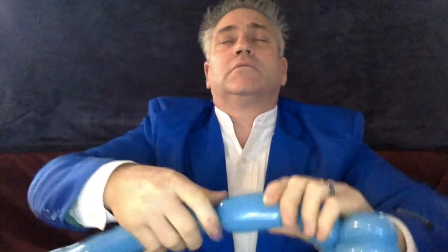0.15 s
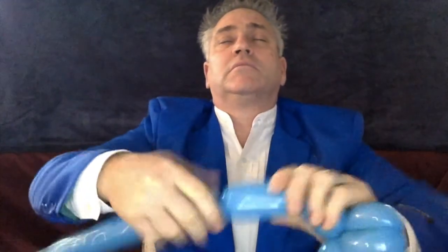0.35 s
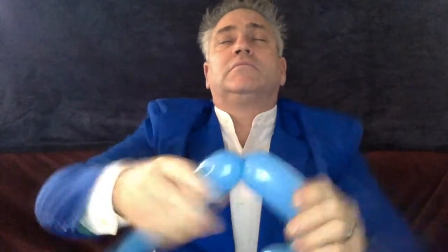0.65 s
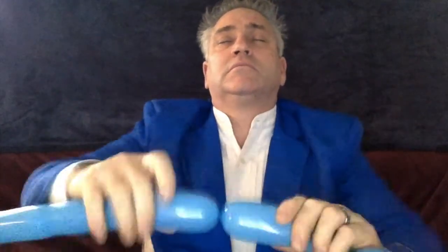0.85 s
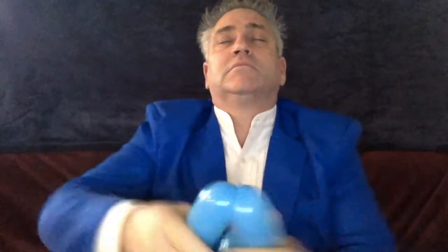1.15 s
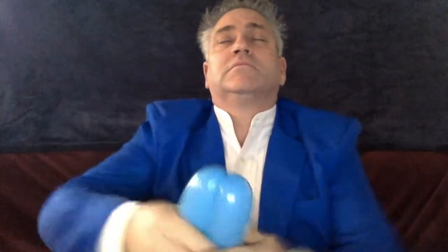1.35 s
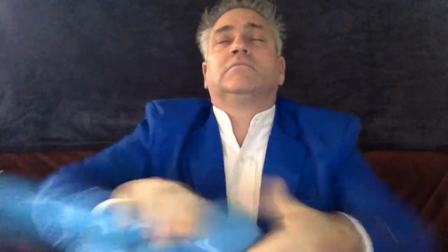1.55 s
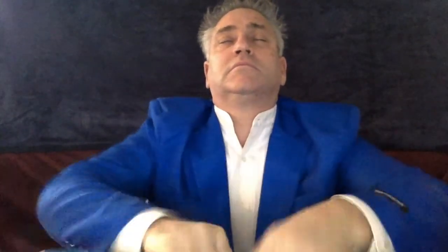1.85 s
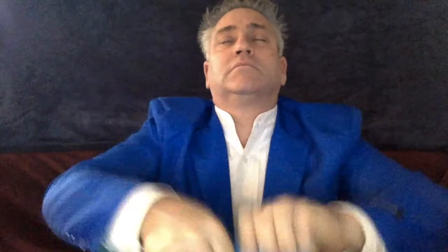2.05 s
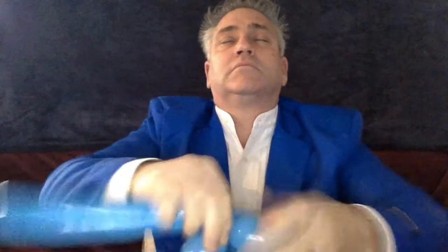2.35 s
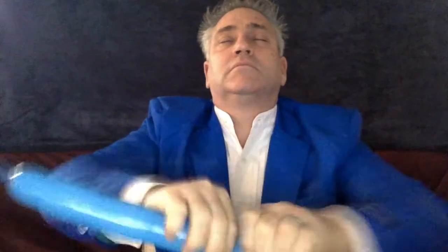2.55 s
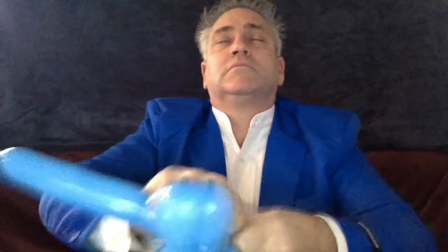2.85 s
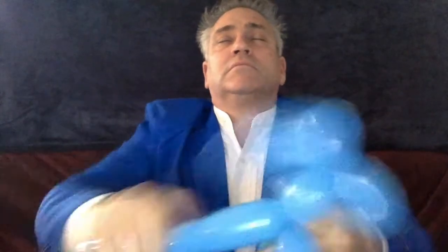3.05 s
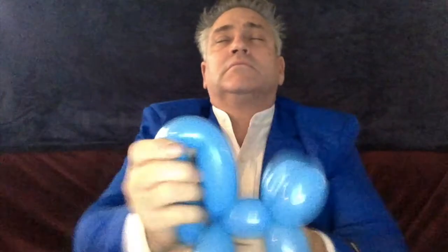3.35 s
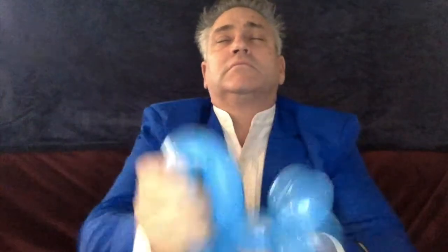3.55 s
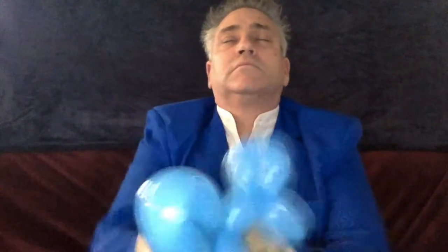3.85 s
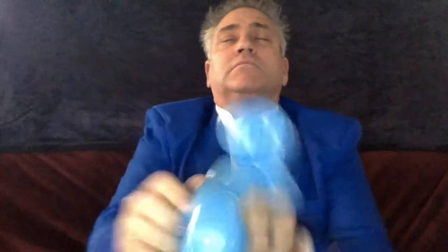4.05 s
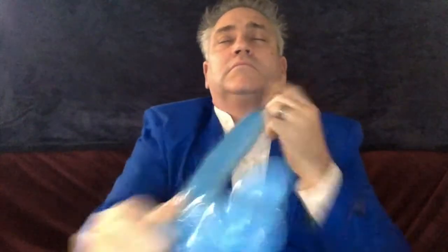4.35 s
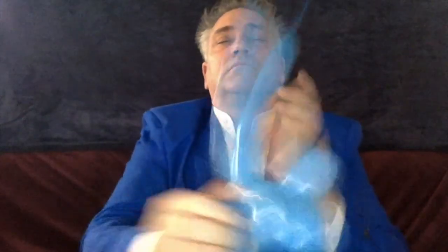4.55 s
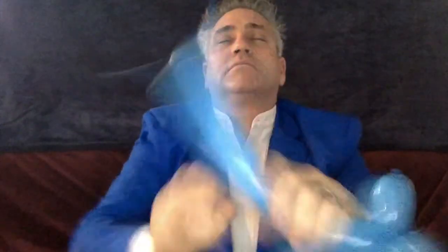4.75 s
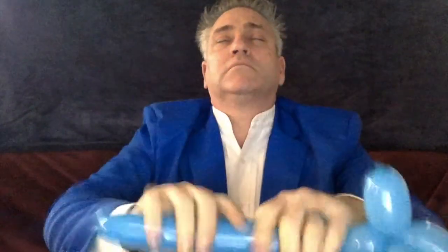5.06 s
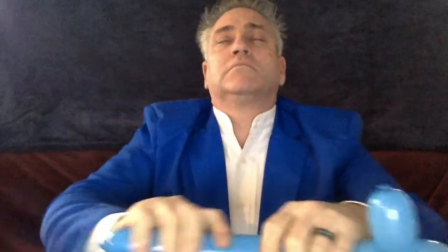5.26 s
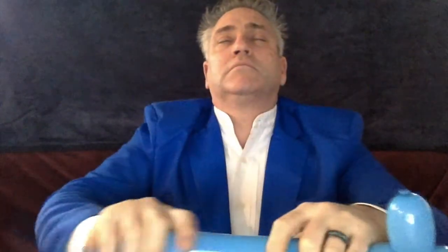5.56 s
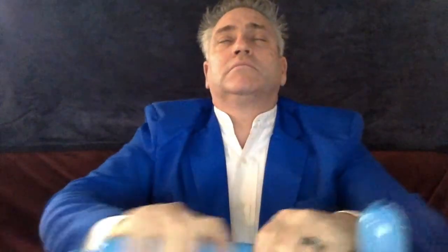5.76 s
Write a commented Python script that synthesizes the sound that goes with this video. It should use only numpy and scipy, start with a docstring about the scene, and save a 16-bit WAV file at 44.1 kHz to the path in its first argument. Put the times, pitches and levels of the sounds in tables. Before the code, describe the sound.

Taut rubber sticks and slips against skin and itself, making ragged chirps, creaks and crisp ticks with a hollow ring. The handling is irregular, busiest and loudest in the middle with dull air-filled thuds, then thins to light rubs and two small rising squeaks. Near, dry, thin-bassed sound with a short room tail and soft hiss.

```python
"""In a quiet, soft room, hands twist and rub a long rubber balloon close to a small microphone.
Rubber sticks and slips on skin and on itself: each slip is a tick that rings the taut wall and the air inside.
Ragged bursts, even squeaks and creaks stand out over a soft rub; knocks and thuds shake the air column.
The sources are trains of ticks and noise through resonances, over a short room tail and steady hiss."""
import sys
import numpy as np
from scipy import signal
from scipy.fft import rfft, irfft
from scipy.io import wavfile
from scipy.ndimage import uniform_filter1d

SR = 44100
rng = np.random.default_rng(int(sys.argv[2]) if len(sys.argv) > 2 else 0)


def file_out(sig):
    """Save sig as 16-bit WAV at sys.argv[1]."""
    # one column per channel
    cols = np.atleast_2d(sig).T
    # limit, then scale
    lim = np.clip(cols, -1, 1)
    pcm = np.round(lim * 32767).astype(np.int16)
    wavfile.write(sys.argv[1], SR, pcm)


N = 259735

# Spectrum of the steady hiss: f/Hz, density/dB before the overall level
HISS_SPECTRUM = [(24, -48), (40, -18), (1440, -13), (2380, 0), (8550, -12), (14800, -8), (16000, -14)]
HISS_DB = -67  # rms
# Decay of the room tail: f/Hz, t60/s
ROOM_DECAY = [(300, 0.32), (2500, 0.23), (12000, 0.19)]
# Hands thudding against the balloon: peak t/s, level of the air column's hum/dB, rumble level/dB
HAND_THUDS = [(.07, -48, -77), (.4, -48, -78), (.514, -41, -51.5), (.78, -46, -66), (.88, -39.5, -50),
              (.97, -43, -58), (1.197, -54, -60), (1.345, -51.5, -72), (1.726, -63, -90), (1.976, -61, -82),
              (2.205, -41, -56.5), (2.495, -41, -58), (2.601, -40.5, -73), (2.688, -42, -53),
              (3.008, -49, -45), (3.188, -49, -69), (3.582, -36, -49), (3.79, -50, -55), (4.075, -36, -44),
              (4.255, -43, -33), (4.429, -45.5, -43), (4.704, -51, -62), (4.91, -48, -46.5),
              (5.75, -53.5, -84)]
THUD_RISE_DB_PER_S, THUD_FALL_DB_PER_S = 396.5, 260.5
# Knocks that shake the air column: t/s, level/dB, f/Hz, t60/s (held to at least 0.02)
COLUMN_KNOCKS = [(0.082, -27, 470, 0.043), (0.609, -34.5, 366, 0.122), (1.179, -26, 313, 0.044),
                 (1.335, -39, 338, 0.057), (2.689, -13.5, 324, 0.038), (2.997, -21.5, 267, 0.042),
                 (3.174, -23.5, 291, 0.059), (3.58, -22, 413, 0.044), (3.789, -12.5, 372, 0.024),
                 (4.079, -17, 392, 0.015), (4.236, -16.5, 327, 0.046), (4.393, -29.5, 188, 0.088),
                 (4.544, -35.5, 147, 0.075), (4.686, -34, 379, 0.07), (4.871, -28.5, 195, 0.032),
                 (4.902, -26, 292, 0.054), (4.94, -43, 297, 0.056)]
COLUMN_HZ = 322  # pitch of the air column under squeaks and thuds
# The moving hands' rub: t/s, wall and fizz level/dB, hollow level/dB, each before trims
HAND_RUB = [(0.0, -48, -49), (.3, -71, -45.5), (.469, -32.5, -63), (.73, -66, -91), (.828, -45, -39.5),
            (1.33, -60, -57), (1.561, -60.5, -64.5), (1.711, -23.5, -27.5), (1.87, -41, -42.5),
            (1.985, -27, -42), (2.35, -48, -46), (2.76, -36, -46.5), (3.45, -56.5, -56), (4.28, -42.5, -49),
            (4.52, -75.5, -68.5), (4.7, -39, -52.5), (5.478, -73.5, -76), (5.882, -36, -48)]
# Squeaks, one curve each: t/s, slip rate/Hz, level/dB before its colour
SQUEAK_CURVES = [
    [(.494, 1130, -38), (.503, 2300, -32), (.516, 2550, -33)],
    [(1.8765, 112, -32.5), (1.925, 129, -27.5), (1.95, 274, -22.5), (2.037, 342, -22)],
    [(1.6615, 1790, -11.5), (1.674, 1742, -15), (1.678, 1280, -7.5), (1.686, 1370, -9), (1.691, 1150, -10),
     (1.703, 800, -14), (1.71, 340, -10.5), (1.726, 325, -22.5)],
    [(2.1945, 382, -30.5), (2.2055, 338, -13), (2.2125, 312, -13), (2.228, 334, -36)],
    [(3.371, 320, -33), (3.385, 330, -24.5), (3.428, 320, -33.5), (3.443, 240, -35)],
    [(3.655, 300, -60.5), (3.69, 290, -61.5), (3.74, 430, -55), (3.765, 350, -57.5)],
    [(5.7, 400, -40), (5.714, 500, -29.5), (5.73, 590, -28), (5.75, 640, -28.5), (5.766, 670, -31)],
    [(5.8075, 377, -23), (5.825, 420, -26.5), (5.856, 660, -27.5)],
]
# Colour of each squeak: unevenness/0-1, fizz level/dB, hollow level/dB, drive of the air column/dB
SQUEAK_TIMBRES = [(0.05, -14, -25, -60), (.4, -0.5, -7.5, -33.5), (0.08, -2, -11, -59.5),
                  (.05, -1.5, -4.5, -9), (0.2, -8, -39, -47.5), (.08, -16.5, 18.5, -46),
                  (0.05, -5, -10.5, -45), (0.3, -4, -12, -27)]
# Snaps, a grip that breaks at once and dies away:
# break t/s, level/dB, fall/s, ring of the gripped patch f/Hz, hollow level/dB
GRIP_SNAPS = [(.1163, -37, 0.019, 2280, -16), (0.1822, -22, 0.029, 2660, -3.5),
              (.443, -28.5, 0.047, 2296, -5), (.48, -30, 0.095, 2570, -6.5),
              (0.497, -17.5, 0.033, 2240, -19), (0.7498, -21, 0.023, 2240, -6.5),
              (0.9777, -22, 0.019, 1830, -3), (1.0631, -28, 0.046, 3410, -2), (1.144, -42, 0.07, 2300, -17),
              (1.1814, -22, 0.012, 2060, 2.5), (1.2564, -18.5, 0.0071, 2260, -7.5),
              (1.29, -38, 0.0069, 2300, -13), (1.408, -40.5, 0.0087, 2100, -3),
              (1.466, -36.5, 0.0071, 2450, -13), (1.7288, -19, 0.021, 3850, -2),
              (1.7435, -22, 0.0046, 3470, -17), (1.7814, -30.5, 0.063, 2380, -2),
              (2.0365, -17.5, .005, 4000, -14.5), (2.05, -19.5, 0.018, 3320, -30),
              (2.1577, -40, 0.0136, 2860, -4), (2.351, -37.5, .006, 2300, -20),
              (2.644, -21.5, 0.0067, 3000, -15), (2.6733, -27, 0.0096, 4300, -30),
              (2.6881, -1, 0.0078, 3000, -8), (2.7803, -32.5, 0.038, 2000, -2), (2.874, -45, .008, 3700, 6),
              (2.999, -15, 0.012, 1670, -4.5), (3.0517, -30, 0.022, 3100, 2.5),
              (3.1596, -34.5, .015, 4410, -5), (3.1766, -7, 0.0052, 2450, -4), (3.1841, -29, .06, 2100, 3),
              (3.3017, -26, 0.0064, 4270, -27), (3.3163, -32, .006, 2260, -20),
              (3.5633, -19.5, 0.033, 3720, -33), (3.5826, -2.5, 0.0054, 2350, -24),
              (3.97, -37, .006, 2800, -12), (3.978, -28, 0.0094, 3520, -14), (4.0102, -32, 0.036, 2685, -3),
              (4.0428, -27.5, 0.0045, 2710, -13.5), (4.0506, -33, 0.02, 3520, -19),
              (4.1023, -17.5, 0.0092, 2400, -17), (4.1967, -21, .006, 2740, -22),
              (4.2101, -18.5, 0.0089, 2530, -13.5), (4.2218, -26, 0.024, 2380, -30.5),
              (4.241, -10, 0.016, 2650, -4), (4.3037, -16, 0.045, 2470, -5), (4.6865, -30, 0.021, 2210, -8),
              (5.14, -45, 0.0048, 2500, 10), (5.1795, -27.5, 0.021, 2700, 0.5),
              (5.1985, -24.5, 0.0065, 2330, -10), (5.573, -43, 0.0044, 4250, -12.5)]
# Swells, a twist that tightens before it gives:
# peak t/s, level/dB, rise/s, fall/s (held to at least 0.0015), ring f/Hz, hollow level/dB
GRIP_SWELLS = [(0.083, -21.5, 0.039, 0.014, 2290, -1), (0.3865, -19, 0.042, 0.035, 2270, -6),
               (1.0439, -24.5, 0.021, .004, 3790, -10), (1.603, -29, 0.0089, 0.043, 2270, -2.5),
               (2.106, -18.5, .012, 0.014, 2320, -17), (2.5294, -19, 0.038, 0.0049, 2380, -12.5),
               (2.6021, -19.5, 0.042, 0.032, 3370, -11), (2.9482, -33, 0.017, 0.011, 3550, 3.5),
               (2.9758, -25, 0.0086, .003, 3750, -18), (3.6652, -26, 0.0087, 0.0027, 2220, 0.5),
               (3.7888, -10, 0.0096, 0.0014, 3667, -8.5), (3.856, -25, 0.018, .006, 2295, -1.5),
               (4.0856, -14, .013, .01, 2210, -6.5), (4.183, -11, .005, 0.0014, 3680, -22),
               (4.6474, -20, 0.018, 0.007, 1670, -32.5), (4.9262, -16.5, .008, 0.0048, 4200, -11),
               (5.1716, -24.5, 0.016, 0.0057, 2500, -4), (5.594, -33, 0.0039, 0.006, 1859, -5.5)]
# Drags, skin that slides on at an even pull, then lets go:
# t/s, level/dB, hold/s, ring f/Hz, hollow level/dB
GRIP_DRAGS = [(0.03, -40, 0.019, 2880, 3), (0.1392, -20.5, 0.038, 1980, -4),
              (0.333, -34.5, 0.05, 2520, -2.5), (0.473, -31.5, 0.0082, 1940, 1),
              (0.6123, -23.5, 0.0099, 3600, -13), (0.6156, -34.5, 0.02, 1870, 0),
              (0.7255, -33.5, 0.019, 3910, -34), (0.7854, -26.5, .1, 3670, -11.5),
              (0.9727, -29, 0.015, 2680, -0.5), (1.946, -26, 0.1, 2260, -5),
              (2.0677, -20, .02, 2300, -18.5), (3.139, -34.5, 0.028, 3650, -7.5),
              (3.4766, -41.5, 0.028, 1770, -3.5), (3.516, -29.5, 0.0017, 3680, 0),
              (3.52, -20.5, 0.017, 3500, -9), (3.859, -12, 0.03, 2230, -7.5),
              (3.936, -26.5, 0.025, 2110, -12), (4.279, -19, 0.0336, 1880, -34),
              (4.6098, -32.5, 0.03, 2547, 0.5), (4.634, -31.5, 0.0044, 3478, -24.5),
              (4.7717, -46, 0.0046, 2280, -24), (4.798, -30, 0.031, 3650, -12),
              (4.9093, -29.5, .012, 3520, 4), (4.9997, -33, 0.074, 3580, -6),
              (5.206, -31, 0.04, 2230, -2.5), (5.304, -35.5, 0.037, 2500, 1.5),
              (5.638, -39, 0.019, 2690, 2)]
SUDDEN_S = .002  # rise of snaps and drags
SNAP_FALL_DB, SWELL_FALL_DB, DRAG_SAG_DB = 18.5, 13, 2.5  # lost over the fall or the hold
SNAP_FIZZ_DB, SWELL_FIZZ_DB, DRAG_FIZZ_DB = 0.2, -2.96, -1.2
SNAP_TICK_DB, SWELL_TICK_DB, DRAG_TICK_DB = 7.5, 3.5, 4.5  # breaking tick, over the burst level
# Modes of the hollow inside: centre f/Hz, width/Hz, relative level/dB
HOLLOW_MODES = [(716, 1380, 2), (900, 400, 9), (1200, 680, -2.5)]
# Modes of the taut wall: centre f/Hz, width/Hz, relative level/dB
WALL_MODES = [(1648, 340, -2.5), (2259, 245, 2.5), (2773, 280, -2), (3643, 406, -0.5), (4234, 470, 1)]
# Modes of the treble fizz: centre f/Hz, width/Hz, relative level/dB
FIZZ_MODES = [(5360, 680, 6), (7150, 300, -5.5), (8450, 2500, -4.5), (11960, 1500, 9.5), (13530, 5000, 14),
              (16300, 1800, 10)]
EDGE_HZ = 15900  # upper band limit


def amp(db):
    """Turn decibels into a linear gain."""
    return 10 ** (np.asarray(db) / 20)


def evened(x):
    """Bring a sound to rms 1."""
    return x / np.sqrt(np.mean(x ** 2) + 1e-20)


def read(points, hz):
    """Read a curve over frequency, straight along a logarithmic axis."""
    f, value = np.transpose(points)
    return np.interp(np.log(hz + 1), np.log(f + 1), value)


def along(rows):
    """Draw each column of a timed table as a curve over the whole scene."""
    s, *columns = np.transpose(rows)
    t = np.arange(N) / SR
    return [np.interp(t, s, column) for column in columns]


def add(mix, s, sound):
    """Lay a sound into the mix from time s on."""
    start = max(round(s * SR), 0)
    part = mix[..., start:start + sound.shape[-1]]
    part += sound[..., :part.shape[-1]]


def drift(count, span):
    """Smooth chance of rms about 1 that changes within span samples."""
    return uniform_filter1d(rng.standard_normal(count), int(span)) * np.sqrt(int(span))


def resonate(x, hz, width):
    """A resonance on the curve hz that turns noise of rms 1 into a ring of rms about 1."""
    phase = 2 * np.pi * np.cumsum(hz * np.ones(len(x))) / SR
    turn = np.exp(1j * phase)
    r = np.exp(-np.pi * width / SR)
    # shift the pitch down to zero, smooth there, shift back
    ring = turn * signal.lfilter([1], [1, -r], x / turn)
    return np.sqrt(2 * (1 - r * r)) * ring.real


def slips(per_s, uneven, spread_db, hiss):
    """Stick-slip: sized ticks at a wandering rate, the first at once, over the hiss of tiny slips; rms near 1."""
    count = len(per_s)
    turns = np.cumsum(per_s * np.exp(uneven * drift(count, 40))) / SR
    # one tick per whole turn, scaled to even out the power over the rate
    ticks = np.diff(np.floor(turns), prepend=-1) * np.sqrt(SR / per_s)
    power_trim_db = spread_db ** 2 * np.log(10) / 20
    size = amp(spread_db * rng.standard_normal(count) - power_trim_db)
    tiny = rng.standard_normal(count)
    return np.sqrt(1 - hiss) * ticks * size + np.sqrt(hiss) * tiny


def floor():
    """The steady hiss of room and microphone: noise shaped by its spectrum."""
    hz = np.fft.rfftfreq(N, 1 / SR)
    spectrum = rfft(rng.standard_normal(N)) * amp(read(HISS_SPECTRUM, hz))
    return amp(HISS_DB) * evened(irfft(spectrum, N))


def room(x):
    """The soft room: sparse reflections of random sign that die faster in the treble."""
    taps = np.zeros(SR // 2)
    at = np.arange(200, len(taps) - 20, 20)
    taps[at + rng.integers(0, 20, len(at))] = rng.choice([-1., 1.], len(at))
    hz, t, z = signal.stft(taps, SR, nperseg=256)
    decay = amp(-60 * t / read(ROOM_DECAY, hz)[:, None])
    tail = signal.istft(z * decay, SR, nperseg=256)[1]
    tail *= amp(-11.5) / np.linalg.norm(tail)
    return signal.fftconvolve(x, tail)[:N]


def thuds():
    """Lumpy low noise, through the air column and below it; each thud swells fast and sinks more slowly."""
    t = np.arange(N) / SR
    level = np.zeros((2, N))
    for s, hum_db, rumble_db in HAND_THUDS:
        shape_db = np.where(t < s, THUD_RISE_DB_PER_S * (t - s), THUD_FALL_DB_PER_S * (s - t))
        # where thuds overlap, the louder one holds
        level = np.maximum(level, amp([[hum_db], [rumble_db]]) * amp(shape_db))
    hum = resonate(resonate(rng.standard_normal(N), COLUMN_HZ, 100), COLUMN_HZ, 130)
    rumble = resonate(resonate(rng.standard_normal(N), 150, 160), 160, 200)
    lumps = amp(2 * drift(N, 600))
    return lumps * (level[0] * evened(hum) + level[1] * evened(rumble))


def knocks():
    """The air column swings up within a cycle or two and dies away together with a dull puff."""
    out, t = np.zeros(N), np.arange(SR // 3) / SR
    for s, db, hz, t60 in COLUMN_KNOCKS:
        puff = evened(resonate(drift(len(t), 42), 140, 300))
        swing = np.sin(2 * np.pi * hz * t) + 0.18 * puff
        onset = 1 - np.exp(-t * hz * 2.0)
        add(out, s, amp(db - 60 * t / max(t60, .02)) * onset * swing)
    return out


def hands():
    """The soft rub as force on hollow, wall and fizz; skin catches and frees within thousandths of a second."""
    rub_db, hollow_db = along(HAND_RUB)
    catch_db = 5.5 * np.minimum(drift(N, 300), 1.4)
    rub = amp(catch_db - 3) * slips(np.full(N, 1600.), uneven=.9, spread_db=5, hiss=0.43)
    return rub * amp([hollow_db, rub_db - 1.5, rub_db - 3.5])


def squeaks():
    """Slips at the rate of the sliding speed; each drives the air column by its own set level, one honks clearly."""
    force, column = np.zeros((3, N)), np.zeros(N)
    for rows, timbre in zip(SQUEAK_CURVES, SQUEAK_TIMBRES):
        uneven, fizz_db, hollow_db, column_db = timbre
        s, *columns = np.transpose(rows)
        t = np.arange(s[0], s[-1], 1 / SR)
        per_s, db = (np.interp(t, s, c) for c in columns)
        push = amp(db) * slips(per_s, uneven, spread_db=0.5 + 5.8 * uneven, hiss=0.035)
        add(force, s[0], push * amp([[hollow_db], [-3], [fizz_db]]))
        add(column, s[0], amp(column_db) * push)
    return force, resonate(column, COLUMN_HZ, 25)


def burst(s, db, rise, length, fade_db, ring_hz, fizz_db, hollow_db, tick_db):
    """One grip breaks into slips: its start, force on hollow, wall and fizz, and ring of the gripped patch."""
    length = max(length, .0015)
    t = np.arange(-1.5 * rise, length + .006, 1 / SR)
    shape_db = np.where(t < 0, 20 * t / rise, -fade_db * t / length)
    shape_db -= 4000 * np.maximum(t - length, 0)  # the grip lets go
    shape_db += 2.94 * np.minimum(drift(len(t), 87), 1.3)  # slips come in clumps
    push = amp(db + shape_db) * slips(np.full(len(t), 2200.), uneven=.6, spread_db=2.5, hiss=.12)
    push[np.argmax(t >= 0)] += amp(db + tick_db)  # the tick as the grip breaks
    padded = np.pad(push, (0, 500))  # lets the patch ring on
    ring = amp(-14.5) * resonate(resonate(padded, ring_hz, 480), ring_hz, 1400)
    return s + t[0], push * amp([[hollow_db], [-4], [fizz_db]]), ring


def bursts():
    """All snaps, swells and drags: grips with their own rise and fall, as force and as patch ring."""
    force, patch = np.zeros((3, N)), np.zeros(N)
    grips = []
    for s, db, fall, hz, low in GRIP_SNAPS:
        grips.append(burst(s, db, SUDDEN_S, fall, SNAP_FALL_DB, hz, SNAP_FIZZ_DB, low, SNAP_TICK_DB))
    for s, db, rise, fall, hz, low in GRIP_SWELLS:
        grips.append(burst(s, db, rise, fall, SWELL_FALL_DB, hz, SWELL_FIZZ_DB, low, SWELL_TICK_DB))
    for s, db, hold, hz, low in GRIP_DRAGS:
        grips.append(burst(s, db, SUDDEN_S, hold, DRAG_SAG_DB, hz, DRAG_FIZZ_DB, low, DRAG_TICK_DB))
    for s, push, ring in grips:
        add(force, s, push)
        add(patch, s, ring)
    return force, patch


def balloon(force):
    """Force rings hollow, wall and fizz, each in its own band; squeezing shifts the modes and their levels."""
    out = np.zeros(N)
    families = (HOLLOW_MODES, WALL_MODES, FIZZ_MODES)
    bands_hz = ((420, 2480), (1150, 7500), (4600, 14670))
    for push, modes, band_hz in zip(force, families, bands_hz):
        total = np.linalg.norm(amp([db for _, _, db in modes]))
        ring = np.zeros(N)
        for k, (hz, width, db) in enumerate(modes):
            level = amp(db + 3.1 * drift(N, 4000)) / total
            moving_hz = hz * (1 + 0.058 * drift(N, 2500))
            ring += (-1) ** k * level * resonate(push, moving_hz, width)  # neighbours in opposite sign
        out += signal.sosfilt(signal.butter(2, band_hz, "band", fs=SR, output="sos"), ring)
    return out


def scene():
    """The near balloon with its room tail, the thuds and the hiss."""
    force, patch = bursts()
    squeak, column = squeaks()
    near = balloon(force + squeak + hands()) + patch + column + knocks()
    return (near + room(near) + thuds() + floor())[None]


def record(dry):
    """A small microphone drops the deep bass and clips peaks beyond full scale; then the band limit."""
    thin = signal.sosfilt(signal.butter(2, 70, "high", fs=SR, output="sos"), dry)
    band_limit = signal.firwin(511, EDGE_HZ, window=("kaiser", 9), fs=SR)
    return signal.oaconvolve(np.clip(thin, -1, 1), band_limit[None], "same")


dry = scene()
out = record(dry)
file_out(out)
```